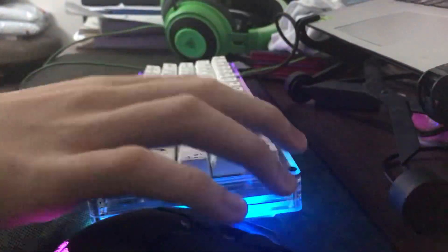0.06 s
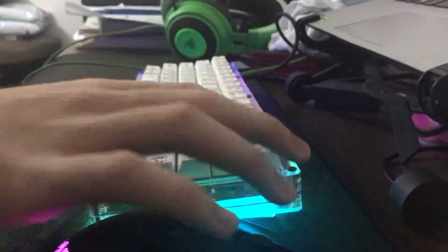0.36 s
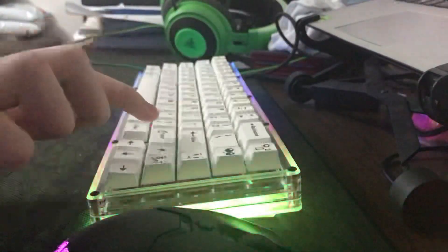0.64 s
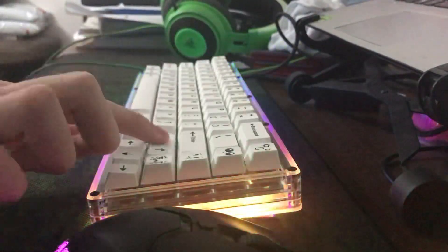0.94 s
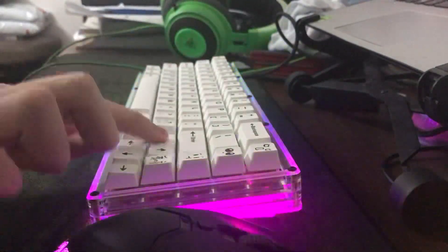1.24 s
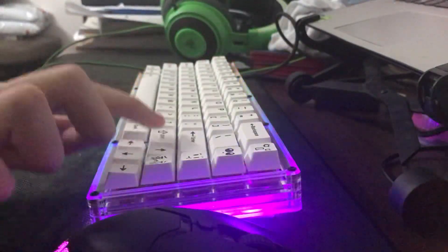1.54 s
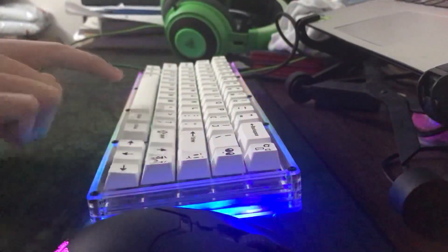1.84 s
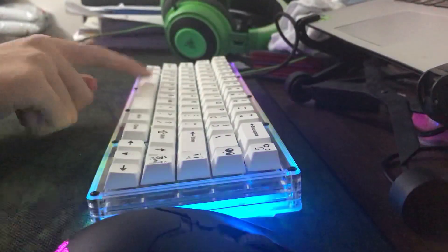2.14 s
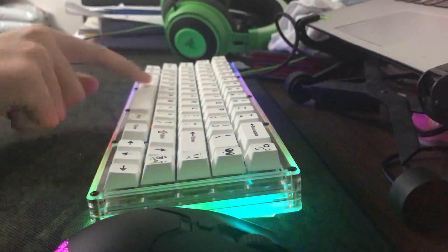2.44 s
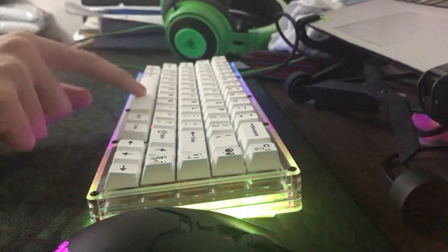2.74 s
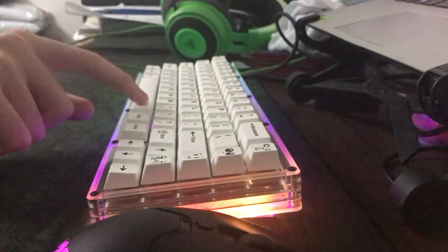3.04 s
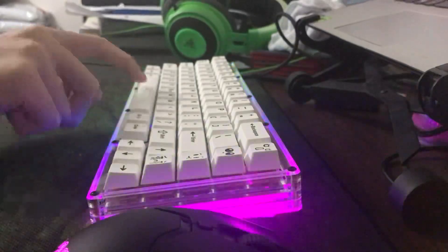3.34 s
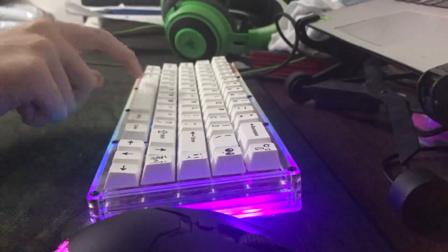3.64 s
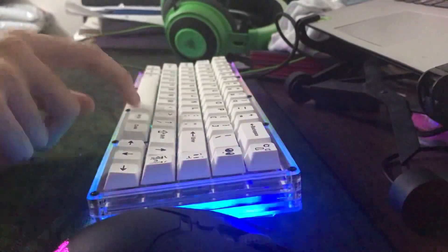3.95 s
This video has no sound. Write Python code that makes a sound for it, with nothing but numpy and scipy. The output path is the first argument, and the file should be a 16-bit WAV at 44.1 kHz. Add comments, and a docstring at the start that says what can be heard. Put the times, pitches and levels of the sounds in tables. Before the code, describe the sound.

Sharp, steady clacking of mechanical keyboard keys and spacebar, pressed one at a time.

```python
"""A mechanical keyboard on a desk, close to the microphone: one finger tries two small keys, then the
spacebar. Each key clacks as it bottoms out and again, softer, as it springs back. The blow cracks,
rings cap and case and thumps the desk; the fingertip taps lightly on the caps. Behind the keys are
the reverberation of a small room and its low, steady rumble."""
import sys
import numpy as np
from scipy import signal
from scipy.fft import rfft, irfft
from scipy.io import wavfile

SR = 44100
rng = np.random.default_rng(int(sys.argv[2]) if len(sys.argv) > 2 else 0)


def output_pcm(signal):
    """Save a mono or channel-first signal as 16-bit PCM at the path in sys.argv[1].

    Samples are clipped to [-1, 1] before scaling.
    """
    pcm = np.clip(np.atleast_2d(signal).T, -1, 1) * 32767
    wavfile.write(sys.argv[1], SR, np.round(pcm).astype(np.int16))


N = 176400
LEAD = SR // 4  # samples of the mix ahead of time zero
T = np.arange(SR // 8) / SR  # seconds into one blow

# Keys bottoming out. Each row: start in seconds, key, level in dB, brightness in dB per octave.
PRESSES = [ (0.1031, "first", -4, 0.5), (.2694, "first", 0.5, 1), (.7363, "second", 0.5, 0),
           (0.8964, "second", 0.5, .5), (1.0659, "second", 1, 0), (1.2285, "second", -0.5, 1.5),
           (1.3866, "second", -1, 1), (1.5554, "second", 2.5, 0.26), (2.1537, "space", -0.5, -0.5),
           (2.2926, "space", -0.5, -1), (2.467, "space", -1, -0.5), (2.6121, "space", -2.5, -0.5),
           (2.7599, "space", -1.5, -0.5), (2.9129, "space", -3.5, -1), (3.0568, "space", -1.5, -0.5),
           (3.2128, "space", 1, 0), (3.3752, "space", 0, -0.5), (3.5244, "space", 0.5, 0),
           (3.6929, "space", 2, 0), (3.859, "space", 0, 0)]
# Keys springing back to their top stop. Each row reads as for a press.
RELEASES = [ (0.0353, "first", 0.5, -0.5), (0.1882, "first", 0, 0), (0.3717, "first", -1, 0),
            (.8120, "second", 1, 1), (0.9761, "second", -0.5, 2), (1.1476, "second", -1.5, -2),
            (1.3131, "second", -2.5, -2), (1.4718, "second", 1, 1), (1.6572, "second", -2.5, -2),
            (2.2176, "space", 1.5, 1), (2.3720, "space", -.5, 0.5), (2.5334, "space", 1, 0.5),
            (2.685, "space", -0.5, 0.5), (2.8378, "space", -3, 0), (2.9933, "space", -8.5, -1.5),
            (3.131, "space", -1, 0.5), (3.2880, "space", -2.5, 0.5), (3.4447, "space", -3, 0),
            (3.5998, "space", 0.5, 1), (3.7629, "space", 1, 1), (3.9269, "space", 1, 0)]
# Modes of cap and case, by key. Each row: frequency in Hz, t60 in seconds, resonance height in dB
# on press and on release.
KEY_MODES = { "first": [(536, 0.046, 15.5, 8), (1020, 0.022, 3.5, -9), (1250, 0.018, 11, 2.5),
             (1740, 0.023, -21, -6), (2074, 0.014, 12.5, -2), (2300, 0.011, 8, -8), (3080, 0.0077, 8, -3.5),
             (3710, 0.0074, 12.5, -8.5), (4190, 0.006, 13, -2.5), (4560, 0.015, 11, -2.5),
             (6170, 0.016, 3.5, -23), (6960, 0.0059, 2.5, -12.5), (8760, 0.0095, -3, -36),
             (11500, .008, -9, -37)], "second": [(585, 0.027, 10, 4.5), (850, 0.016, 2, -8.5),
             (1070, 0.019, 11.5, 0.5), (1542, 0.016, 11.5, 6.5), (2047, 0.017, 12, 7),
             (2490, 0.011, 8.5, 0.5), (3150, 0.0098, 7, -10), (3625, 0.014, 11.5, -11),
             (4060, 0.012, 4.5, -5.5), (5800, 0.031, 1, -5), (6810, 0.018, 3.5, -10),
             (8730, 0.0074, -15, -16), (11000, 0.0072, -6.5, -35), (14500, 0.0079, -12, -19)],
             "space": [(560.6, 0.037, 15.5, 15), (651, 0.033, 14.5, 14), (883, 0.047, -2, 2),
             (1396, 0.012, 6.5, 6.5), (1732, 0.014, 11.5, 7.5), (2150, 0.016, 8.5, 1),
             (2710, 0.011, 2.5, -7.5), (3524, 0.02, 5.5, 0.5), (4520, 0.017, -1, -16),
             (5140, 0.01, 8.5, -2), (5610, 0.0099, 2.5, -3.5), (6780, 0.0069, -3, -12),
             (8550, 0.0077, -1.5, -12), (9600, 0.0051, -5, -18.5), (11030, 0.0073, -7, -18),
             (12900, 0.0037, -12, -10.5)]}
# Contact crack, by key. Each row: level in dB on press and on release, t60 in seconds.
CRACK = {"first": (-0.5, -16, .011), "second": (-3, -9, 0.012), "space": (-2, -8, 0.013)}
# Spectrum of the crack. Each row: frequency in Hz, relative level in dB.
CRACK_COLOUR = [(200, -25), (500, -11), (1200, -6), (2500, 2.5), (4000, -5), (6000, -4), (8000, -12),
                (12000, -15.5), (16000, -24.5)]
# Thump into the desk, by key. Each row: gain in dB on press and on release.
THUMP = {"first": (-2, -7), "second": (-14.5, -18), "space": (0, -1.3)}
# Modes of the desk. Each row: frequency in Hz, relative level in dB, swell time in seconds.
DESK_MODES = [(65.7, -43.5, 0.013), (125.2, -34.5, 0.0061), (156.3, -37.5, 0.0085), (325, -45.5, 0.0025)]
# Fingertip on a cap. Each row: start in seconds, level in dB, brightness in dB per octave.
TOUCHES = [(0.261, -10, 0.5), (0.725, -5, 1), (2.134, -20, 6), (2.142, 3, -1), (2.277, 1, 0.5),
           (2.282, -5, 0.5), (2.970, 1, 0), (3.041, -8, -2.5), (3.359, -2.5, -1), (3.507, -2, 0.5),
           (3.68, -11, -1), (3.84, -8, -2)]
# Spectrum of a touch. Each row: frequency in Hz, relative level in dB.
TOUCH_COLOUR = [(200, -30), (500, -3), (950, 0.5), (1500, -13), (2500, -20), (5000, -18), (9000, -22.5),
                (15000, -39)]
# Reflections from things on the desk. Each row: delay in seconds, gain in dB.
ECHOES = [(.0011, -21), (.0023, -19.5), (.0092, -19), (.0099, -22), (0.0193, -30)]
# What a press sends into the room, by key. Each row: frequency in Hz, gain in dB.
ROOM_SEND = { "first": [(100, 3), (400, -3), (800, -10), (1300, -9), (1800, -11.5), (2400, -2), (3400, -8),
             (4550, -7), (4850, -21), (6500, -19), (7800, -29), (8800, -21), (10500, -31), (13000, -28),
             (15500, -35)], "second": [(100, -12), (400, -6), (750, -7), (1100, -7), (2400, -2), (3000, -7),
             (3700, -7.5), (4900, -21.5), (5800, -12), (6400, -20.5), (7600, -29), (11000, -31.5),
             (15000, -35)], "space": [(100, 2), (250, 3.5), (400, -2), (620, -7), (800, -3), (1200, -10.5),
             (1850, 2), (2500, -2.5), (3100, -12), (3500, -3), (3800, -21), (4600, -20), (5250, -11.5),
             (6200, -22.5), (8000, -27), (8600, -22), (9300, -27), (10500, -27.5), (15000, -35)]}
# Change of that send on release, by key. Each row: gain in dB, tilt in dB per octave.
RELEASE_SEND = {"first": (-13, -4), "second": (-7, -1.9), "space": (-5.5, -1.4)}
# Decay of the room. Each row: frequency in Hz, t60 in seconds.
ROOM_T60 = [(100, 0.13), (600, 0.72), (2000, 0.56), (5000, 0.76), (9000, 1), (15000, 0.63)]
# Spectrum of the room tone. Each row: frequency in Hz, relative level in dB.
RUMBLE_COLOUR = [(20, -29), (35, -22), (55, -3), (110, -5), (150, -5.5), (190, -11.5), (300, -13.5),
                 (430, -11.5), (600, -19), (800, -21), (1400, -21.5), (2200, -29.5), (4000, -39.5),
                 (7000, -48), (15000, -54)]
# Low resonances of the room. Each row: frequency in Hz, width in Hz, lift in dB.
ROOM_MODES = [(52.4, 4, 0.5), (84.2, 4, 8.5), (108.3, 3.2, 12), (130.6, 4.6, 2), (145.8, 4.1, 8)]

ATTACK_S = 0.00012
SCATTER_DB, DETUNE = 1.0, 0.0056  # no two blows land quite alike
CRACK_SAME = 0.59  # share of the crack's energy that repeats from blow to blow on one key
CASE_LOW_HZ, CASE_ORDER = 435, 6.7  # the case radiates little below its first mode
TOUCH_T60_S, ROOM_DELAY_S, RUMBLE_DB = 0.039, 0.0042, -45.5


def keyboard():
    """The keys at close range: every press and release, and the fingertip landing on the caps."""
    mix = np.zeros(LEAD + N)
    for blows, released in ((PRESSES, False), (RELEASES, True)):
        grain = {key: burst(CRACK_COLOUR, t60=CRACK[key][-1]) for key in CRACK}
        for start, key, db, bright_db in blows:
            add(mix, start, amp(db) * clack(key, bright_db, released, grain[key]))
    for start, db, bright_db in TOUCHES:
        add(mix, start, amp(db) * tilt(burst(TOUCH_COLOUR, TOUCH_T60_S), bright_db))
    return (mix + desk_reflections(mix))[LEAD:]


def clack(key, bright_db, released, grain):
    """The stem hits its stop: a ring, a crack with the key's own grain, and a thump in the desk."""
    ring = struck(case_ring(key, released))
    fresh = burst(CRACK_COLOUR, t60=CRACK[key][-1])
    crack = amp(CRACK[key][released]) * (np.sqrt(CRACK_SAME) * grain + np.sqrt(1 - CRACK_SAME) * fresh)
    return tilt(ring + crack, bright_db) + amp(THUMP[key][released]) * desk_thump()


def case_ring(key, released):
    """Cap and case ring in short modes, a little different in level and pitch at each blow."""
    hz, t60, press_db, release_db = np.transpose(KEY_MODES[key])[:, :, None]
    scatter, detune = rng.standard_normal((2, len(hz), 1))
    db = (release_db if released else press_db) + SCATTER_DB * scatter
    height = amp(db) * 2 * np.log(1000) / (t60 * SR)  # resonance height to starting amplitude
    polarity = (-1) ** np.arange(len(hz))[:, None]
    modes = polarity * height * fade(T, t60) * np.cos(2 * np.pi * hz * (1 + DETUNE * detune) * T)
    return modes.sum(0) * (1 - np.exp(-T / ATTACK_S))


def struck(ring):
    """Gives a ring the abrupt front of a hard blow and thins its bass, as the small case does."""
    hz = abs(np.fft.fftfreq(len(ring), 1 / SR))
    gain = abs(np.fft.fft(ring)) / np.sqrt(1 + (CASE_LOW_HZ / (hz + 1)) ** (2 * CASE_ORDER))
    log_gain = np.log(np.maximum(gain, 1e-3))
    minimum_phase = np.exp(np.conj(signal.hilbert(log_gain)))
    return np.fft.ifft(minimum_phase).real


def desk_thump():
    """The desk under the keyboard takes the blow: its low modes swell and die away."""
    return sum(amp(db) * T / swell * np.exp(1 - T / swell) * np.sin(2 * np.pi * hz * T)
               for hz, db, swell in DESK_MODES)


def desk_reflections(direct, cutoff_hz=4800):
    """Things on the desk throw the sound back to the microphone, a little later and duller."""
    dull = signal.lfilter(*signal.butter(1, cutoff_hz, fs=SR), direct)
    return sum(amp(db) * np.roll(dull, round(delay * SR)) for delay, db in ECHOES)


def reverberation():
    """Each press and release leaves a tail in the room."""
    mix = np.zeros(LEAD + N)
    tails = {key: room_tail(key) for key in ROOM_SEND}
    add(mix, start=-0.03, sound=amp(2.5) * tails["first"])  # a press just before the start still rings
    for start, key, db, bright_db in PRESSES:
        add(mix, start, amp(db) * tilt(tails[key], bright_db))
    for start, key, db, bright_db in RELEASES:
        softer_db, duller_db = RELEASE_SEND[key]
        add(mix, start, amp(db + softer_db) * tilt(tails[key], bright_db + duller_db))
    return mix[LEAD:]


def room_tail(key):
    """The room's diffuse answer to one blow: noise that dies at its own rate in each band."""
    hz, t, bands = signal.stft(noise(ROOM_SEND[key], size=SR), SR, nperseg=512)
    t60 = read(ROOM_T60, hz)[:, None]
    decaying = bands * fade(t, t60) * np.sqrt(2 * np.log(1000) / (t60 * SR))
    tail = signal.istft(decaying, SR, nperseg=512)[1][:SR]
    onset = np.clip(np.arange(SR) / SR / ROOM_DELAY_S - 0.5, 0, 1)
    return tail * onset


def rumble():
    """Room tone: a steady rumble, droning a little in the room's resonances, with a faint hiss."""
    hz = np.fft.rfftfreq(N, 1 / SR)
    lift_db = sum(db / (1 + (2 * (hz - centre) / width) ** 2) for centre, width, db in ROOM_MODES)
    drone = irfft(rfft(noise(RUMBLE_COLOUR, size=N)) * amp(lift_db), N)
    return amp(RUMBLE_DB) * drone / drone.std()


def burst(colour, t60):
    """A short dying puff of coloured noise with unit-energy envelope."""
    shape = fade(T, t60) * (1 - np.exp(-T / ATTACK_S))
    return noise(colour, size=len(T)) * shape / np.linalg.norm(shape)


def noise(colour, size):
    """Noise whose spectrum follows the table."""
    gain = amp(read(colour, np.fft.rfftfreq(size, 1 / SR)))
    return irfft(rfft(rng.standard_normal(size)) * gain, size)


def tilt(sound, bright_db):
    """Tips the spectrum above 500 Hz by bright_db per octave, pivoting at 2 kHz."""
    hz = np.fft.rfftfreq(2 * len(sound), 1 / SR)
    octaves = np.log2(np.maximum(hz, 500) / 2000)
    return irfft(rfft(sound, 2 * len(sound)) * amp(bright_db * octaves))[:len(sound)]


def amp(db):
    """Decibels to gain."""
    return 10 ** (np.asarray(db) / 20)


def read(points, hz):
    """Reads a table on a log-frequency axis."""
    table_hz, value = np.transpose(points)
    return np.interp(np.log(hz + 1), np.log(table_hz), value)


def fade(t, t60):
    """Exponential decay, 60 dB down at t60."""
    return np.exp(-np.log(1000) * t / t60)


def add(mix, start, sound):
    """Lays a sound into the mix, start seconds from time zero."""
    part = mix[LEAD + round(start * SR):][:len(sound)]
    part += sound[:len(part)]


def scene():
    """The keyboard up close and the room behind it, on one microphone."""
    return (keyboard() + reverberation() + rumble())[None]


def record(dry):
    """The recorder passes nothing much above 16.3 kHz."""
    lowpass = signal.firwin(255, 16300, window=("kaiser", 9), fs=SR)
    return signal.oaconvolve(dry, lowpass[None], "same")


dry = scene()
out = record(dry)
output_pcm(out)
```